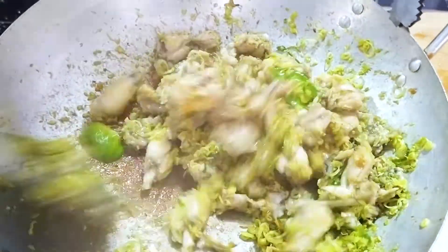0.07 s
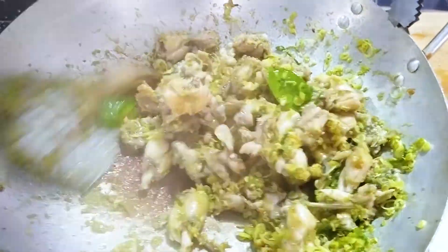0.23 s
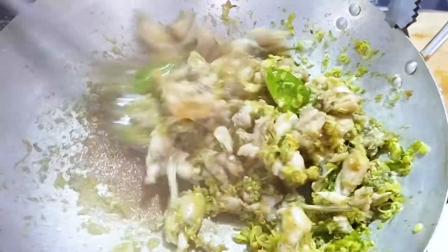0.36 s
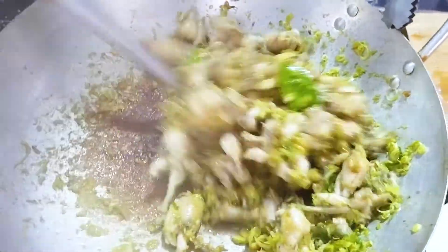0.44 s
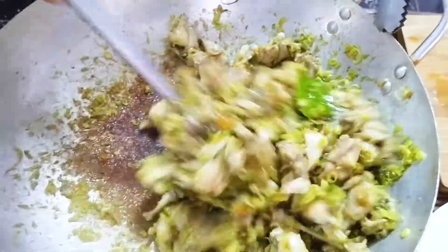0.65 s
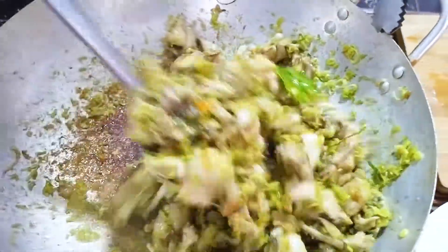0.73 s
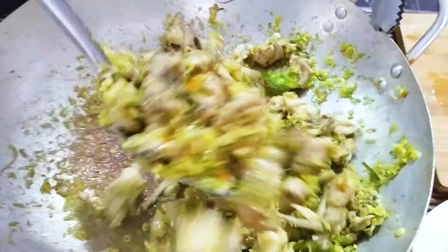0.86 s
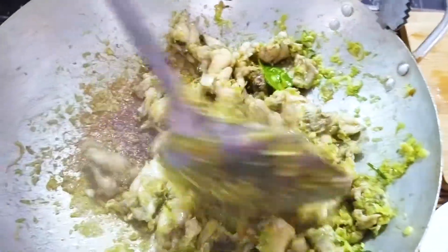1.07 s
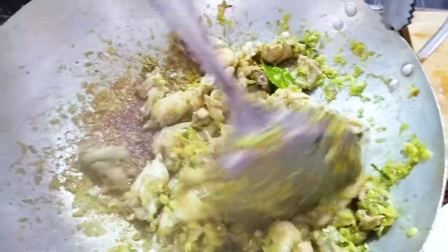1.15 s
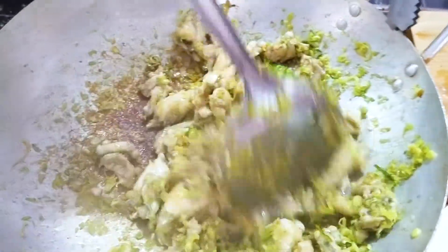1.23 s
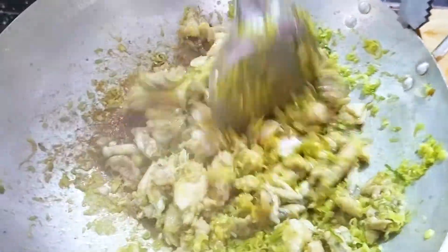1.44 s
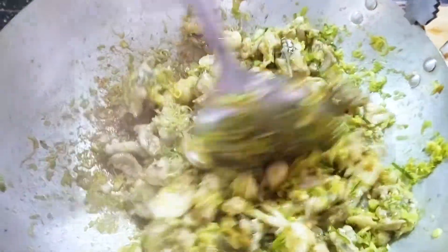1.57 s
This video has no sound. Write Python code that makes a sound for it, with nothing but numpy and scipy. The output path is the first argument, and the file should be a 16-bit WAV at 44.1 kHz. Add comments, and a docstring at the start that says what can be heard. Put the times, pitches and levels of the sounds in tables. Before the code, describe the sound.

A metal spatula stirs food in a steel wok, close up in a small kitchen, with oil sizzling softly throughout. It lands with a thud at 0.2 seconds, then scrapes and clatters from 0.3 to 0.65, loudest around 0.5 and ending in a brief squeak. Lighter knocks and a wet slap of food follow between 0.9 and 1.3 seconds, the pan ringing faintly under the sizzle.

```python
"""Stir-frying in a steel wok

Close up in a small kitchen, on two microphones. A metal spatula lands in the pan, scrapes under the
food in one long, sticking and slipping push, then knocks twice as it turns the pile. Oil sizzles
throughout as tiny bubbles burst, and flares where wet food meets bare hot steel. The wok rocks on
its stand; pan and room ring on over a low steady rush."""
import sys
import numpy as np
from scipy import signal
from scipy.fft import rfft, irfft
from scipy.io import wavfile
from scipy.ndimage import uniform_filter1d

SR = 44100
rng = np.random.default_rng(int(sys.argv[2]) if len(sys.argv) > 2 else 0)


def transcribe(signal):
    """Save signal, clipped to [-1, 1], as a 16-bit WAV file at the path in sys.argv[1]."""
    frames = np.atleast_2d(signal).T
    limited = np.clip(frames, -1, 1)
    pcm = np.round(limited * 32767).astype(np.int16)
    wavfile.write(sys.argv[1], SR, pcm)


N = 70560
T = np.arange(N) / SR
HALF_EACH_SIDE = np.array([[.5], [-.5]])  # shares a difference between left and right

# Spectrum of the background rush: freq_hz, gain_db
RUSH_COLOUR = [(25, -84), (70, 11.5), (150, -1), (300, -4.5), (550, 1), (1000, 11.5), (3000, 8.5),
               (16000, -29)]
# Decay of the kitchen: freq_hz, t60_s
ROOM_DECAY = [(100, 0.12), (500, 0.25), (2000, 0.53), (5000, 0.43), (14000, 0.36)]
# Phase lag of the left microphone behind the right: freq_hz, lag_rad
LEFT_LAG = [(100, 0.32), (500, 0.39), (1350, 1.3), (1650, 3.02), (2200, 0.55), (2900, 4.37), (15000, 14.56)]

# Flare and ebb of the oil: time_s, level_db
SIZZLE_LEVEL = [(0, -36.5), (.09, -41), (.16, -45), (.3, -40), (.37, -30.5), (.47, -39), (.56, -34),
                (.68, -36.5), (.8, -39.5), (.9, -45), (1.04, -42.5), (1.2, -43.5), (1.38, -45), (1.48, -38),
                (1.6, -44.5)]
# Spectrum of the oil: freq_hz, gain_db
SIZZLE_COLOUR = [(100, -59), (1200, -16), (3300, -24.5), (4500, -4), (5500, -2), (6600, 4.5), (7600, 2),
                 (9000, 6), (10400, 2.5), (11500, 4.5), (12800, 0.5), (14000, -8.5)]
# The oil's own lean between the microphones: freq_hz, left_minus_right_db
SIZZLE_SIDE = [(1000, 35), (5000, -0.5), (6700, 5), (8400, -8.5), (9600, -6), (11500, 0.5), (13000, -10),
               (15000, 6)]

# The wok rocking on its stand: time_s, level_db
ROCKING_LEVEL = [(.14, -65), (.2, -41), (.26, -46), (.33, -38), (.46, -45), (.58, -80), (.85, -72),
                 (.92, -58), (1.03, -60), (1.09, -54.5), (1.2, -50), (1.3, -61)]
# Shoves against the stand: start_s, level_db
BUMPS = [(0.2095, -23.5), (0.323, -28.5), (1.168, -37)]
# Spectra of the rocking and the shoves: freq_hz, gain_db
ROCKING_COLOUR = [(25, -30), (60, -16), (100, 1), (165, 7.5), (230, -5), (600, -8), (3000, -55)]
BUMP_COLOUR = [(60, -35), (165, 2.5), (310, -10), (420, -6), (700, -30), (3000, -32)]
# Ringing modes of the pan: pitch_hz, gain_db, t60_s
WOK_MODES = [(344, -10.5, 0.2), (522, 4, 1), (1325, 0, 0.56), (1740, 4, 0.27), (2243, 5, 0.42),
             (2520, 7, 0.64), (2690, 13, 1), (3320, 15, 0.72)]

# Wet food slapping hot steel, and light taps of the blade's edge: start_s, level_db
SLAPS = [(0.523, -23), (1.068, -22.5)]
TAPS = [(0.879, -30), (0.897, -36.5), (1.287, -37)]
# Spectra of the slaps and taps: freq_hz, gain_db
SLAP_COLOUR = [(200, -17), (1100, -10), (2600, 9.5), (3800, 5.5), (4600, 10), (8000, 8), (11500, 3),
               (15500, -15)]
TAP_COLOUR = [(150, -43), (1200, -22), (2400, -1), (3400, -0.5), (4200, -13.5), (15000, -46)]

# The blade catches and sings: start_s, length_s, pitch_hz, end_pitch_hz, level_db, waver_share
SQUEAKS = [(0.546, 0.014, 2078, 2120, -19.5, 0.011), (0.57, 0.025, 2079, 2068, -18.5, 0.0138),
           (0.585, 0.027, 2109, 2140, -32, 0.0195), (0.937, 0.031, 1370, 1260, -44, 0.024),
           (0.995, 0.051, 1408, 1304, -42, 0.011), (1.347, 0.04, 591.5, 669, -39.5, 0.25),
           (1.373, 0.045, 772, 905, -43, 0.18)]
# Low rumble, rasp and fine grit of the dragging blade: time_s, level_db
RUMBLE_LEVEL = [(0, -63.5), (.2, -53.5), (.235, -35), (.31, -43), (.35, -26.5), (.44, -29.5), (.5, -18.5),
                (.53, -42.5), (.62, -36.5), (.68, -50), (.9, -54.5), (1.0, -63), (1.12, -47.5), (1.25, -60)]
RASP_LEVEL = [(.2, -100), (.41, -27.5), (.445, -24), (.51, -17.5), (.54, -36.5), (.6, -28), (.65, -40),
              (.8, -52), (1.2, -59), (1.24, -64), (1.28, -62)]
GRIT_LEVEL = [(.315, -48), (.345, -24), (.38, -28), (.44, -27.5), (.51, -29), (.53, -28.5), (.6, -26.5),
              (.65, -44.5), (.72, -57.5), (1.06, -48), (1.085, -38), (1.14, -51), (1.6, -47)]
# Spectra of those three parts of the drag: freq_hz, gain_db
RUMBLE_COLOUR = [(30, -68), (70, -66), (110, -19.5), (170, -10.5), (280, -9), (400, -5.5), (570, 1),
                 (720, -1.5), (950, -20.5), (1500, -26), (5000, -44.5)]
RASP_COLOUR = [(100, -78), (700, -24), (1000, -8.5), (1250, 2), (1850, 3), (2300, 7.5), (2900, -4.5),
               (4200, -16), (5600, -41), (16000, -56)]
GRIT_COLOUR = [(200, -20), (1550, -2.5), (2150, 8.5), (2800, 7.5), (3400, 7.5), (4150, 8), (4900, 7),
               (5800, 0), (6800, 10), (7800, -1), (9300, -1), (12500, -11), (15500, -44)]

# Spatula blows on the wok: start_s, thud_db, clank_db, tick_db
KNOCKS = [(0.2085, -19, -40, -66), (0.333, -29, -56, -26.5), (0.364, -21.5, -44, -23.5),
          (0.392, -35, -59, -24.5), (0.4181, -19, -28, -16), (0.451, -38, -31, -23),
          (0.4752, -31, -29, -34), (0.495, -21.5, -24, -50), (0.505, -16.5, -17.5, -34),
          (0.524, -36, -35, -15.5), (0.536, -49, -30, -22), (0.592, -25.5, -40, -50),
          (0.604, -32.5, -35, -23), (1.0144, -70, -35.5, -55), (1.066, -31, -26, -36),
          (1.16, -34, -19, -50), (1.172, -37, -39, -56), (1.309, -37, -45, -68), (1.52, -61, -44, -58)]
# Spectra of those three parts of a blow: freq_hz, gain_db
THUD_COLOUR = [(70, -36), (160, -13), (310, -8.5), (540, 11.5), (800, 1.5), (1100, 1), (1700, -10.5),
               (4000, -16.5), (16000, -70)]
CLANK_COLOUR = [(80, -40), (500, -21), (950, -14), (1280, 4.5), (1650, 4), (1900, -0.5), (2250, 2),
                (2700, -8), (3200, -6.5), (3700, -22.5), (16000, -28)]
TICK_COLOUR = [(100, -37), (1500, -11), (2400, 1), (3000, -7.5), (4100, 0), (5200, -27), (15500, -34)]


def amp(db):
    """Decibels to gain."""
    return 10 ** (np.asarray(db) / 20)


def unit(x):
    """Scales to rms 1."""
    return x / np.sqrt(np.mean(x ** 2) + 1e-20)


def level(points):
    """Gain over time from (time_s, level_db) points."""
    return amp(np.interp(T, *np.transpose(points)))


def at_hz(points, hz):
    """Reads a table on a log-frequency axis."""
    freqs, values = np.transpose(points)
    return np.interp(np.log(hz + 1), np.log(freqs + 1), values)


def convolve(x, response):
    """Convolves channel by channel, cut to the scene's length."""
    return signal.fftconvolve(np.atleast_2d(x), np.atleast_2d(response), axes=1)[:, :N]


def minimum_phase(log_gain):
    """Spectrum of the causal filter with this log gain."""
    return np.exp(np.conj(signal.hilbert(log_gain)))


def colour(x, points, size=4096):
    """Causal filter of unit energy: the points set only the shape of the spectrum."""
    log_gain = np.log(amp(at_hz(points, abs(np.fft.fftfreq(size, 1 / SR)))))
    response = np.fft.ifft(minimum_phase(log_gain)).real[:size // 2]
    return convolve(x, response / np.linalg.norm(response))


def wander(hz):
    """Random motion of rms 1, up to about hz."""
    freqs = np.fft.rfftfreq(N, 1 / SR)
    return unit(irfft(rfft(rng.standard_normal(N)) / (1 + (freqs / hz) ** 4), N))


def clicks(per_s, spread_db):
    """Random clicks of uneven size, rms 1."""
    sizes = amp(spread_db * np.minimum(rng.exponential(1, N), 4))
    return unit(sizes * rng.choice([-1, 1], N) * (rng.random(N) < per_s / SR))


def blow(db, rattle=.1, rattle_s=.0025, size=1024):
    """A sharp push and a short rattle, with the energy of 5 ms of sound at level db."""
    push = rattle * rng.standard_normal(size) * np.exp(-T[:size] / rattle_s)
    push[0] = 1
    return amp(db) * np.sqrt(.005 * SR) * push / np.linalg.norm(push)


def strikes(rows, tone):
    """Short contacts that share one colour."""
    force = np.zeros(N)
    for start_s, db in rows:
        add(force, start_s, blow(db))
    return colour(force, tone)


def add(mix, start_s, sound):
    """Adds a sound at start_s."""
    part = mix[max(round(start_s * SR), 0):][:len(sound)]
    part += sound[:len(part)]


def rush(level_db=-52):
    """A steady rush behind everything, with a faint part that is separate at each microphone."""
    near = bowl(colour(rng.standard_normal(N), RUSH_COLOUR))
    wide = colour(rng.standard_normal((2, N)), RUSH_COLOUR)
    return amp(level_db) * (near + 0.055 * wide)


def kitchen(x, level_db=-1, alike_hz=1300, onset_s=0.0037):
    """The small room's diffuse tail, alike at both microphones in the bass."""
    hz, t, noise = signal.stft(rng.standard_normal((2, SR)), SR, nperseg=256)
    alike = np.exp(-(hz[:, None] / alike_hz) ** 2 / 2)
    noise[1] = alike * noise[0] + np.sqrt(1 - alike ** 2) * noise[1]
    decay = amp(-60 * t / at_hz(ROOM_DECAY, hz)[:, None])
    tail = signal.istft(noise * decay, SR, nperseg=256)[1][:, :SR]
    tail *= np.minimum(T[:SR] / onset_s, 1)
    return amp(level_db) * convolve(x, tail / np.linalg.norm(tail[0]))


def bowl(x, scatter_db=4, decay_s=0.0037, above_hz=1370, size=2048):
    """The curved steel scatters the treble towards two microphones without changing its tone."""
    scatter = rng.standard_normal((2, size)) * np.exp(-T[:size] / decay_s)
    scatter *= amp(scatter_db) / np.linalg.norm(scatter, axis=1, keepdims=True)
    paths = signal.lfilter(*signal.butter(2, above_hz, "high", fs=SR), scatter)
    paths[:, 0] += 1  # the direct sound
    spectrum = np.fft.fft(paths)
    smooth_power = uniform_filter1d(abs(spectrum) ** 2, size=9, axis=1, mode="wrap")
    flattened = spectrum / minimum_phase(np.log(smooth_power) / 2)
    return convolve(x, np.fft.ifft(flattened).real[:, :size // 2])


def rocking():
    """The wok rumbles on its stand and bumps when shoved against it."""
    rumble = colour(rng.standard_normal(N) * level(ROCKING_LEVEL), ROCKING_COLOUR)
    return rumble + strikes(BUMPS, BUMP_COLOUR)


def shimmer(x, depth_db=3.5, size=11):
    """Patches of the spectrum swell and fade on their own."""
    spectra = signal.stft(x, nperseg=512)[2]
    bands = uniform_filter1d(rng.standard_normal(spectra.shape), size, axis=1)
    patches = unit(uniform_filter1d(bands, size, axis=2))
    return signal.istft(spectra * unit(amp(depth_db * patches)), nperseg=512)[1][:, :N]


def sizzle(sputter_db=0.53, spit_db=-8):
    """Thousands of tiny bubbles burst in sputters; among them, fewer and larger ones spit."""
    pops = clicks(per_s=2400, spread_db=6) * unit(amp(sputter_db * wander(hz=48)))
    frying = shimmer(bowl(pops))
    spits = amp(spit_db) * bowl(clicks(per_s=170, spread_db=-5.5))
    balance = amp(at_hz(SIZZLE_SIDE, np.fft.rfftfreq(N, 1 / SR)) * HALF_EACH_SIDE)
    oil = irfft(rfft(frying + spits) * balance, N)
    return colour(oil * level(SIZZLE_LEVEL), SIZZLE_COLOUR)


def wok_ring(force, count=7, split_share=.022):
    """The pan rings on after contact, each mode a cluster of close partials that beat."""
    t, ring = T[:SR], np.zeros(SR)
    for hz, db, t60 in WOK_MODES:
        detune, phase = rng.random((2, count, 1))
        offsets = 2 * (np.arange(count)[:, None] + detune) / count - 1  # -1 to 1
        partials_hz = hz * (1 + split_share * offsets)
        cluster = np.cos(2 * np.pi * (partials_hz * t + phase)).sum(0) / np.sqrt(count)
        resonance_scale = 2 * np.log(1000) / (t60 * SR)  # offsets the build-up of a long decay
        ring += amp(db - 60 * t / t60) * resonance_scale * cluster
    return convolve(force, ring)


def squeaks():
    """The blade's slips lock briefly to one gliding pitch, clean or roughened by its waver."""
    out = np.zeros(N)
    for start_s, length_s, hz, end_hz, db, waver in SQUEAKS:
        progress = np.clip((T - start_s) / length_s, 0, 1)
        pitch_hz = (hz + (end_hz - hz) * progress) * (1 + waver * wander(hz=293))
        phase = 2 * np.pi * np.cumsum(pitch_hz) / SR
        out += amp(db) * np.sin(np.pi * progress) * unit(np.sin(phase))
    return out


def scrape(judder_db=3.5, stall_db=-3.5, stall_s=.006):
    """The blade sticks and slips in dense, juddering clicks; it stalls just before each knock."""
    stalls = [np.exp(-((T - start_s + stall_s) / stall_s) ** 2) for start_s, *_ in KNOCKS]
    judder = unit(amp(judder_db * wander(hz=82.5))) * amp(stall_db * np.max(stalls, axis=0))
    parts = (RUMBLE_LEVEL, RUMBLE_COLOUR), (RASP_LEVEL, RASP_COLOUR), (GRIT_LEVEL, GRIT_COLOUR)
    drag = np.zeros((1, N))
    for curve, tone in parts:
        slips = clicks(per_s=3500, spread_db=5)
        drag += colour(slips * judder * level(curve), tone)
    return drag


def knocks():
    """The spatula hits the pan; thud, clank and tick vary with how squarely the blade lands."""
    thud, clank, tick = np.zeros((3, N))
    for start_s, *parts_db in KNOCKS:
        for force, db in zip((thud, clank, tick), parts_db):
            add(force, start_s, blow(db))
    return colour(thud, THUD_COLOUR) + colour(clank, CLANK_COLOUR) + colour(tick, TICK_COLOUR)


def scene():
    """Spatula, wok and oil close to the microphones, the kitchen and a low rush behind."""
    blows = knocks() + strikes(TAPS, TAP_COLOUR) + strikes(SLAPS, SLAP_COLOUR)
    drag = scrape()
    squeal = squeaks()
    hits = bowl(blows)
    drag_and_oil = bowl(drag) + sizzle()
    background = rocking() + rush()
    room = kitchen(drag_and_oil + amp(-4) * hits + amp(-10) * squeal)
    ring = bowl(wok_ring(blows + amp(-7) * drag))  # a dragging blade damps the pan: less ring
    return background + room + ring + drag_and_oil + squeal + hits


def record(dry, top_hz=15800):
    """A close pair: the left microphone hears the pan later, with less bass; the top is cut off."""
    hz = np.fft.rfftfreq(N, 1 / SR)
    left_minus_right_db = at_hz([(60, 0), (300, -2), (700, -1.5), (2000, 1), (3000, -4), (4000, 1.5),
                                 (5200, 0), (6800, 1.5), (8500, 1), (13000, 4.5)], hz)
    balance = amp(left_minus_right_db * HALF_EACH_SIDE)
    lag = np.exp(-1j * at_hz(LEFT_LAG, hz) * HALF_EACH_SIDE)
    heard = irfft(rfft(dry) * balance * lag, N)
    lowpass = signal.firwin(511, top_hz, window=("kaiser", 9), fs=SR)
    return signal.oaconvolve(heard, lowpass[None], "same")


dry = scene()
out = record(dry)
transcribe(out)
```